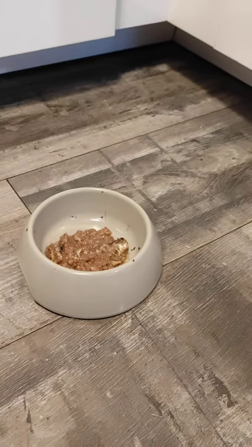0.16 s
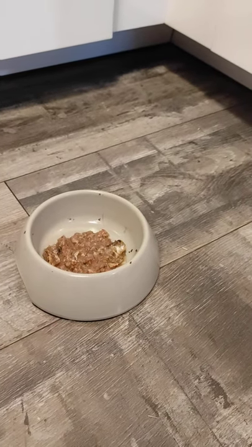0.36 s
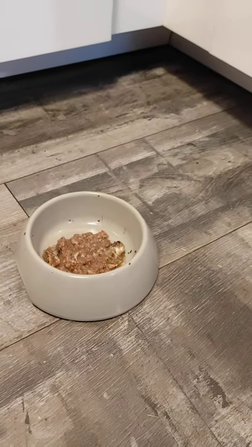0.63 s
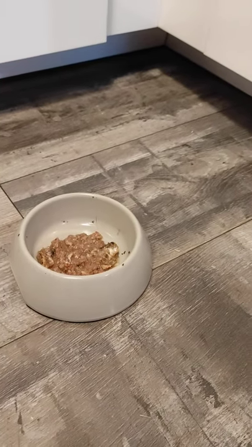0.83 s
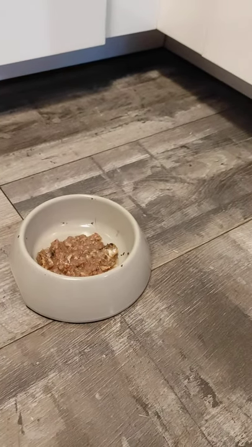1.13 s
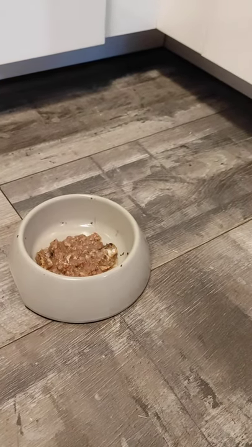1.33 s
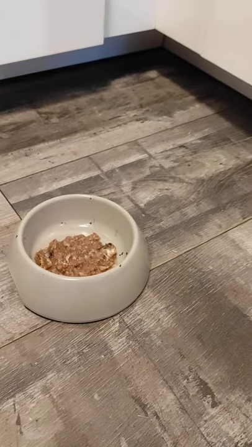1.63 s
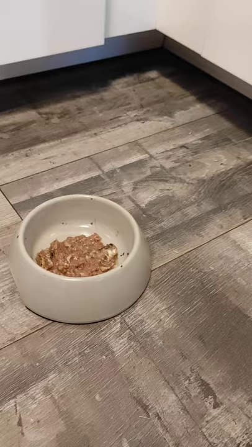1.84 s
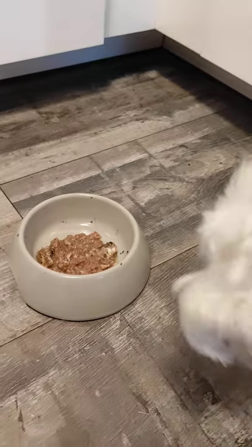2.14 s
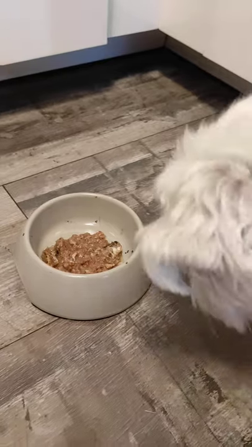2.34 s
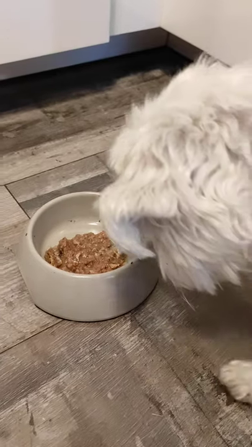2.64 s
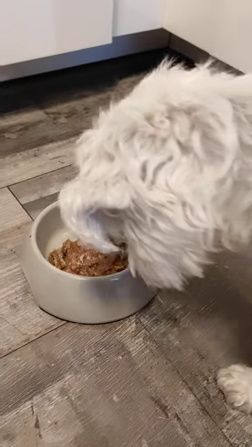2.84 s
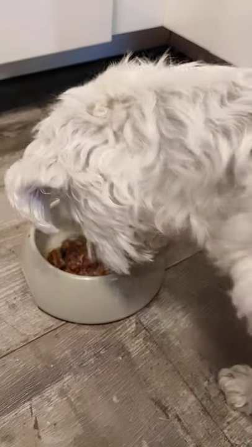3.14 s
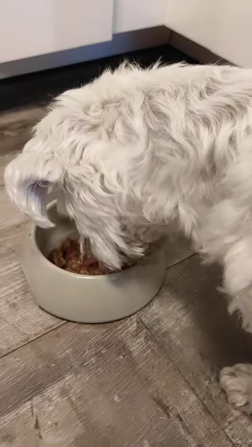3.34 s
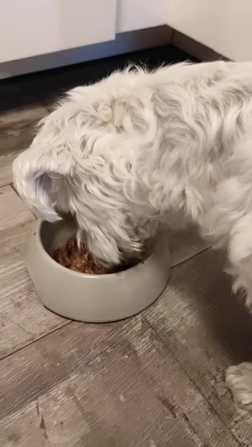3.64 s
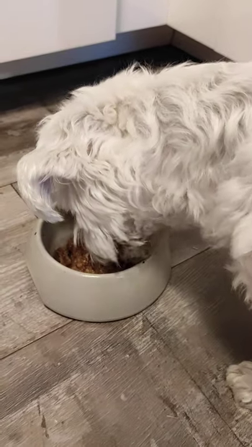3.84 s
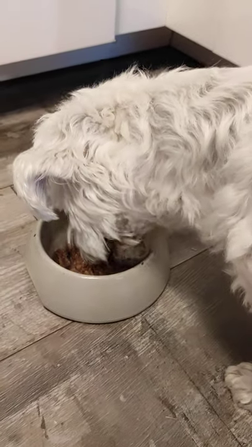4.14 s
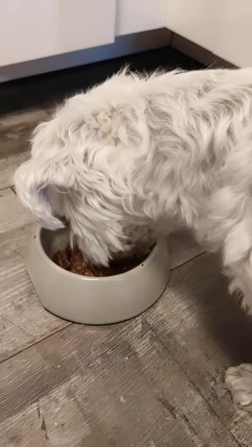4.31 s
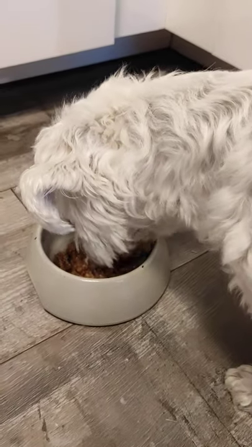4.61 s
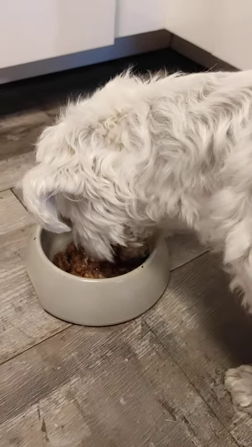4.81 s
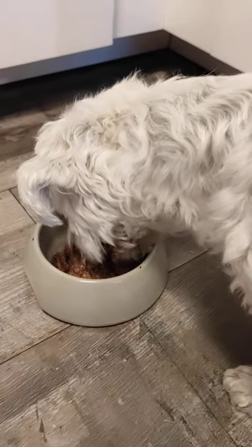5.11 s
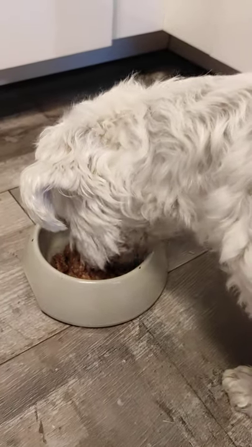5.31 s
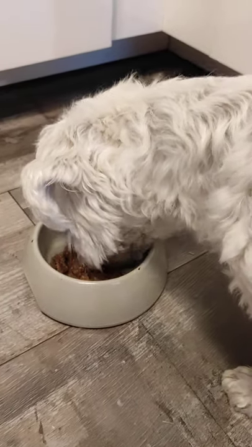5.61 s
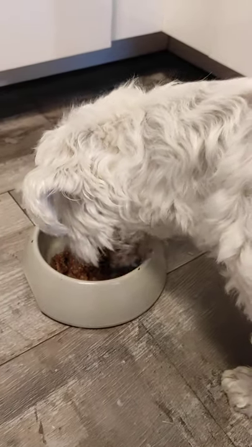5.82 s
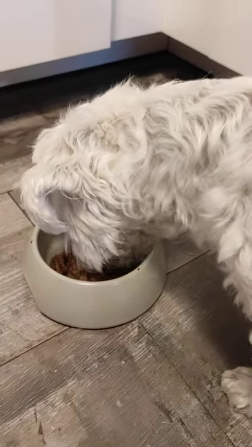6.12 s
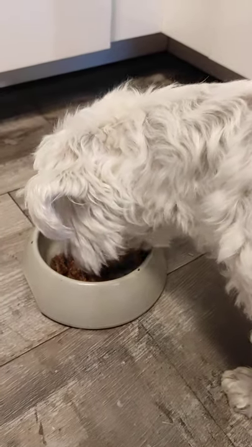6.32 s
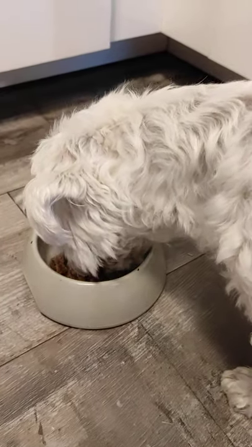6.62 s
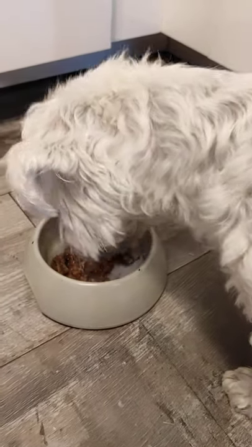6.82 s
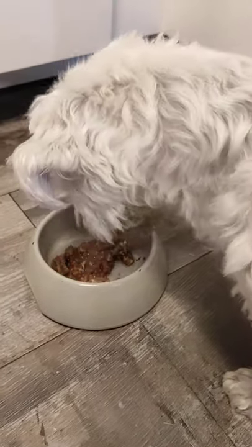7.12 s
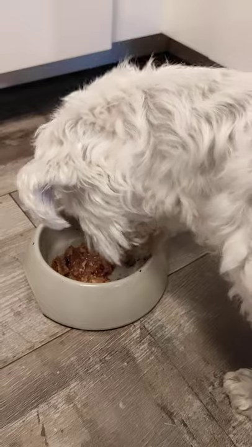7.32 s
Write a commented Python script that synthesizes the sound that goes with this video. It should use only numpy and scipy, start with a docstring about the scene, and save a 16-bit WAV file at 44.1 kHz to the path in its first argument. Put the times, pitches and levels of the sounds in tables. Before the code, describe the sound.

Dog claws tick and skid across a hard kitchen floor, then close wet smacking, licking and little pops as it eats over a low appliance hum.

```python
"""A small dog trots over a laminate kitchen floor to its bowl and eats wet food, heard close.
Claws tick and skid: short noise bursts and swells in three bands, with claw and floor resonances.
Wet smacks, licks and pops: bursts of tiny rings, wet crackle and rising damped tones.
The bowl bumps the floor as four decaying modes; a noise tail per band gives the hard kitchen.
Behind lie coloured noise and two steady tones of an appliance; left and right differ in treble."""
import sys
import numpy as np
from scipy import signal
from scipy.fft import rfft, irfft, next_fast_len
from scipy.io import wavfile
from scipy.ndimage import uniform_filter1d

SR = 44100
rng = np.random.default_rng(int(sys.argv[2]) if len(sys.argv) > 2 else 0)


def unload_wav(signal):
    """Save mono or channel-first audio to the path in sys.argv[1] as 16-bit WAV at rate SR, clipped to [-1, 1]."""
    wavfile.write(
        sys.argv[1],
        SR,
        np.round(np.clip(np.atleast_2d(signal).T, -1, 1) * 32767).astype(np.int16),
    )


N = 328986
SIZE = next_fast_len(N + 2048)
FREQ = np.maximum(np.arange(SIZE // 2 + 1) * SR / SIZE, 1)
SIDES = np.array([[.5], [-.5]])  # times a left-minus-right dB
LEFT_LATE_CLAWS, LEFT_LATE_EATING = -8, 10  # samples; negative: the left side hears first


# claws landing: start_s, treble_db, middle_re_treble_db, body_re_treble_db, claw_hz, floorboard_hz
CLAW_TICKS = [(0.0375, -41, -6, -17, 5200, 2420), (0.04, -31, -7, -24, 5660, 2420),
              (0.0514, -36.5, -3.5, -22, 4360, 1500), (0.3381, -27.5, -11, -24, 5900, 2440),
              (0.3765, -32, -5.5, -13.5, 5000, 1530), (0.5113, -44, -4, -10, 5270, 1810),
              (0.5227, -31.5, -12, -14, 5670, 1750), (0.578, -39, -6, -16, 5500, 1800),
              (0.607, -34, -2.5, -18, 5530, 2440), (0.728, -54, 3, -14, 4410, 1560),
              (0.8107, -25.5, -5, -10.5, 5370, 1520), (0.8428, -19.5, -8.5, -21.5, 5100, 1000),
              (0.9982, -30, -8.5, -14.5, 5860, 2520), (1.079, -43, -5, -9.5, 5590, 1190),
              (1.243, -47.5, -20, -7, 5710, 1220), (1.262, -53.5, 1.5, -5, 5400, 1350),
              (1.3657, -35, -11.5, -9.5, 5370, 2330), (1.466, -48.5, -0.5, -12, 5780, 1240),
              (1.531, -41, -5.5, -9, 4900, 1200), (1.687, -42, -3.5, -8, 5100, 920),
              (1.8437, -33.5, -6.5, -17, 5740, 910), (1.9941, -44, -3, -7, 4030, 1290),
              (2.015, -43, -5, -9, 4720, 1290), (2.047, -33.5, -9, -9.5, 4040, 2500),
              (2.0507, -26.5, -13.5, -16, 4150, 1240), (2.1587, -36, -12.5, -17.5, 4400, 824),
              (2.217, -42, -10, -9, 4550, 1050), (2.236, -45, -1.5, -1.5, 4030, 1060),
              (2.638, -30, -13.5, -21.5, 3570, 730), (2.8618, -27, -12, -14, 5000, 1010),
              (2.658, -46, -12, -19, 5000, 900), (2.901, -39.5, -5, -12, 5230, 1180),
              (3.192, -32, -8.5, -19, 4640, 1110), (3.1967, -44, -6, -4, 4640, 1120),
              (3.2102, -27.5, -8.5, -14, 4600, 780), (3.568, -58, -8, -3, 5040, 2340),
              (3.623, -50, -20, -24, 6000, 900), (3.63, -44.5, -9.5, -17, 5500, 883),
              (3.7599, -25, -12, -19.5, 4160, 910), (3.931, -40.5, -11.5, -2, 2800, 2320),
              (3.936, -57.5, -7.5, 9, 2710, 1290)]
CLAW_RATTLE_MS, CLAW_RISE_MS, CLAW_SHARPNESS = 5.78, 0.41, 1.2


def claws():
    """Hard claws hit the board in a short rattle; claw and floorboard ring broadly."""
    rows = []
    for row in CLAW_TICKS:
        pan_db, room_db = place(row[0])
        rows.append((*row, pan_db, CLAW_RATTLE_MS, room_db))
    return ticks(rows, grit(2.1, 0.15), CLAW_RISE_MS, CLAW_SHARPNESS, toes=True)


# claws dragging: peak_s, rise_s, fall_s, treble_db, middle_re_treble_db, body_re_treble_db
CLAW_SKIDS = [(0.015, 0.065, 0.058, -45, -3.5, -6), (0.043, 0.0098, 0.011, -35.5, 0.5, -14),
              (0.102, 0.0092, 0.04, -48, 3, 2), (0.198, 0.064, 0.06, -41, -2.5, -5),
              (0.339, 0.0095, 0.023, -34, -6, -4), (0.512, 0.015, 0.023, -45.5, -11, -3),
              (0.533, 0.036, 0.069, -32, -0.5, -9), (0.575, 0.023, 0.038, -46.5, -1.5, -1),
              (0.607, 0.03, 0.015, -39, 0.5, 1), (0.734, 0.021, 0.016, -51.5, 5, 0),
              (0.861, 0.019, 0.042, -35.5, -7, -1), (1.158, 0.013, 0.015, -38.5, -11, -11),
              (1.179, 0.024, 0.028, -36.5, 0.5, -7), (1.368, 0.0085, 0.005, -47, 13.5, -8),
              (1.869, 0.018, 0.013, -43.5, 3, 0.5), (2.085, .02, 0.047, -42.5, -3.5, -8),
              (2.225, 0.06, 0.016, -47, 3.5, -5), (2.382, 0.007, 0.016, -41.5, -3, -9),
              (2.393, 0.016, 0.022, -29, -7, -8), (2.44, 0.027, 0.025, -47, -4, -4),
              (2.515, 0.016, 0.052, -54.5, 1, 8.5), (2.615, 0.05, 0.018, -52, 2.5, 3),
              (2.636, .004, .012, -64, -3, -4), (3.05, 0.044, 0.043, -44.5, -3, -4.5),
              (3.564, 0.05, 0.035, -57.5, -3, -9), (3.778, 0.016, 0.0092, -52, -7, 12),
              (3.95, 0.017, 0.063, -60.5, -2.5, 7)]
STUTTER_DB, STUTTER_PER_S, DRAG_HZ, DRAG_SHARPNESS = 2, 200, 5200, 0.81


def skids():
    """The dragged claw sticks and slips: grit with stuttering level and a broad middle-band ring."""
    grains_mix = undb(-1.5) * grains(3500, 2.6, sharp=6.1, late=LEFT_LATE_CLAWS)
    scrape = crumble(grit(3.5, 0.035) + grains_mix)
    stutter = undb(STUTTER_DB * walk(STUTTER_PER_S, count=N))
    swells = drags([(*row, place(row[0])[0]) for row in CLAW_SKIDS])
    out = scrape * stutter * swells
    out[1] = 1.05 * signal.lfilter(*signal.iirpeak(DRAG_HZ, DRAG_SHARPNESS, SR), out[1])
    return out


# dog walking in from the right: time_s, left_minus_right_db, room_share_db
WALK_IN = [(0, -2.5, -2.5), (0.8, -1, -9), (1.3, 1, -2), (2.0, 3, -10.5), (3.2, 3.5, -9.5),
           (3.8, 5.5, -9.5)]


def place(s):
    """Where the walking dog is heard at a time: pan dB and room share dB."""
    at_s, pan_db, room_db = np.transpose(WALK_IN)
    return np.interp(s, at_s, pan_db), np.interp(s, at_s, room_db)


# short wet smacks, and near the end a harder rattling tick, perhaps a claw:
# start_s, treble_db, middle_re_treble_db, body_re_treble_db, middle_ring_hz
CLEAR_SMACKS = [(3.581, -48.5, 3, -3, 3280), (3.589, -49, 0, 6, 3560), (4.0836, -56, 4, -13, 6200),
                (4.1647, -51, -7, -1, 2500), (4.2846, -54.5, 2.5, 12, 6270), (4.339, -58, 4, -5, 3900),
                (4.4263, -44.5, 1, -19, 7000), (4.5272, -49.5, -22, -8, 2590), (4.566, -51, -18, -7, 2800),
                (4.5956, -51, 0.5, -1, 5300), (4.609, -49, -9, -2, 3980), (4.7403, -52.5, -2, -9, 3110),
                (4.862, -55, -18, 11, 2960), (4.9046, -40, -15, -13, 4870), (4.944, -47.5, -3, -3, 6300),
                (4.9739, -39.5, -13, -11, 4570), (5.0656, -48.5, -17, -10, 2730),
                (5.1334, -46, -2.5, 5.5, 4900), (5.187, -52, -14, 8, 2720), (5.2022, -51, -12, -7, 3700),
                (5.246, -46, -21, -2, 5600), (5.2695, -50, -16, -6, 2710), (5.3755, -50.5, -5, -11, 5270),
                (5.3941, -60, -15, -11, 5330), (5.4143, -47, -7, -11, 3570), (5.477, -40.5, -2.5, -8, 4600),
                (5.511, -47.5, -14, -2, 6500), (5.5418, -46, -26, 3.5, 3000), (5.5676, -38, -13, -7, 6760),
                (5.744, -53.5, 5.5, -9, 3260), (5.8163, -48.5, -4, -10, 5300), (5.85, -49, -22, -2, 5320),
                (5.866, -46, -22, -20, 6500), (5.878, -31.5, -9.5, -15, 3580),
                (5.9165, -40.5, -17, -18, 6200), (5.982, -44.5, 0, -9, 7000), (6.003, -50, -5, 4, 4970),
                (6.0155, -44.5, -14, -0.5, 2510), (6.1542, -41.5, -16, -30, 3530),
                (6.2387, -47, 2, -1, 5200), (6.284, -49, -19, -17, 5220), (6.309, -56, -15, -6, 6000),
                (6.339, -54, -15, -8, 6000), (6.3521, -46.5, -19, 5, 2550), (6.5011, -50.5, -14, -10, 2640),
                (6.5265, -53.5, 4, -18, 5800), (6.6256, -41.5, -18, -8, 2560), (6.641, -47, -17, -9, 4500),
                (6.6555, -50, -6, -4, 3800), (6.673, -35.5, -31, -17, 4160),
                (6.6805, -34.5, -30, -10.5, 2570), (6.7126, -36.5, -14, -19, 6740),
                (6.8406, -47, -6.5, 6, 4480), (6.958, -56, -22, -12, 3730), (7.0409, -45, -36, -17, 3980),
                (7.079, -47, -14, -20, 2890), (7.1762, -39, -4, -14, 5060), (7.1812, -39, -4, -19, 4360)]
# faint smacks: from_s, to_s, lowest_treble_db, middle_re_treble_db, body_re_treble_db
FAINT_SMACK_RANGE = (5.5, 7.3, -57.5, -4, -12)
SMACK_RISE_MS, SMACK_SHARPNESS, LOWEST_BODY_HZ = 3.36, 7, 1100
FAINTEST_RATTLE_MS, RATTLE_MS_PER_DB = 2.39, 0.11  # louder smacks rattle longer
SMACK_ROOM_DB, SMACK_PAN_DB, SMACK_PAN_SPREAD_DB = -10.5, -1.5, 1


def smacks():
    """Bursts of tiny rings with scattered middle and body colours; 16 faint ones at random."""
    from_s, to_s, faint_db, middle_db, body_db = FAINT_SMACK_RANGE
    faint = [(from_s + when * (to_s - from_s), faint_db + 6 * size, middle_db, body_db, 2500 * 2.6 ** pitch)
             for when, size, pitch in rng.random((16, 3))]
    rows = []
    for row in CLEAR_SMACKS + faint:
        body_hz = LOWEST_BODY_HZ * 2 ** rng.random()
        pan_db = SMACK_PAN_DB + SMACK_PAN_SPREAD_DB * rng.standard_normal()
        rattle_ms = FAINTEST_RATTLE_MS + RATTLE_MS_PER_DB * (row[1] - faint_db)
        rows.append((*row, body_hz, pan_db, rattle_ms, SMACK_ROOM_DB))
    return ticks(rows, grains(12000, 1.8, sharp=3.1), SMACK_RISE_MS, SMACK_SHARPNESS)


# tongue dragging through the mush: peak_s, length_s, treble_db
TONGUE_LICKS = [(3.987, 0.073, -65), (4.105, 0.094, -57), (4.233, .04, -62), (4.295, 0.13, -63),
                (4.45, 0.2, -64), (4.597, 0.074, -52), (4.745, 0.052, -56.5), (4.88, 0.18, -55.5),
                (4.957, 0.031, -54), (5.08, .12, -61), (5.195, 0.14, -56.5), (5.272, 0.039, -55),
                (5.406, 0.073, -55), (5.496, 0.15, -59), (5.567, 0.021, -46), (5.618, 0.084, -71),
                (5.746, 0.18, -62), (5.905, 0.063, -53), (5.99, 0.11, -64), (6.16, 0.088, -55),
                (6.29, 0.11, -66), (6.35, .06, -61), (6.508, 0.1, -59), (6.635, 0.039, -56),
                (6.7, 0.037, -62), (6.715, .12, -69), (6.958, 0.03, -54), (7.065, 0.063, -57),
                (7.208, 0.12, -64), (7.271, 0.025, -57)]
LICK_RISE_SHARE, LICK_MIDDLE_DB, LICK_BODY_DB, LICK_PAN_DB = 0.24, -6.5, 1, -2  # bands re treble


def licks():
    """The tongue drags through mush: wet crackle of tiny rings swells and fades."""
    rows = [(peak_s, LICK_RISE_SHARE * length_s, (1 - LICK_RISE_SHARE) * length_s, level_db,
             LICK_MIDDLE_DB, LICK_BODY_DB, LICK_PAN_DB) for peak_s, length_s, level_db in TONGUE_LICKS]
    return crumble(grains(2500, 1.9, sharp=3.2)) * drags(rows)


# air pockets popping in mouth and bowl; some (as near 4.0 s and 4.93 s) are followed about 10 ms later by a
# fainter echo at the same pitch: start_s, level_db, pitch_hz
AIR_POPS = [(2.372, -45, 910), (3.919, -54, 2980), (3.937, -46, 546), (3.951, -60, 633),
            (4.0005, -52, 3700), (4.002, -52, 1950), (4.0095, -63, 3700), (4.01, -55, 1950),
            (4.114, -61, 1770), (4.128, -63, 3900), (4.165, -56, 1030), (4.18, -53, 1160),
            (4.239, -54, 696), (4.288, -50, 1980), (4.338, -59, 3900), (4.34, -49, 1910),
            (4.4169, -56, 2010), (4.521, -46.5, 1070), (4.596, -52, 520), (4.609, -53, 1610),
            (4.642, -63, 4170), (4.714, -59, 1730), (4.77, -58, 1700), (4.843, -49, 1040),
            (4.88, -58, 1080), (4.908, -59, 1050), (4.934, -40.5, 507), (4.946, -50, 510),
            (4.944, -49, 1820), (5.103, -61, 1610), (5.134, -43.5, 1114), (5.1347, -51, 1700),
            (5.136, -46, 540), (5.152, -58, 1800), (5.188, -53, 1050), (5.222, -50, 1820),
            (5.223, -52, 2470), (5.279, -53, 2230), (5.413, -56, 2200), (5.481, -52, 476),
            (5.484, -51, 1050), (5.502, -52, 1180), (5.556, -52, 1130), (5.571, -55, 2260),
            (5.813, -57, 1250), (5.898, -47, 520), (5.936, -49, 540), (5.961, -46, 507), (5.983, -52, 1650),
            (6.026, -55, 1140), (6.179, -52.5, 855), (6.352, -47, 2260), (6.353, -56, 1150),
            (6.369, -54, 1120), (6.37, -57, 2000), (6.413, -46, 455), (6.626, -64, 1080),
            (6.657, -63, 1050), (6.677, -48, 2280), (6.684, -50, 2010), (6.699, -57, 2350),
            (6.711, -57, 1200), (6.812, -55, 1030), (6.842, -58, 1110), (7.029, -56, 1085),
            (7.125, -59, 1460), (7.186, -54, 1030)]
POP_T60_S, POP_T60_SLOPE = 0.033, -0.44  # at 1 kHz; higher pops die sooner
POP_ROOM_DB, POP_ROOM_T60_S = -3.5, 0.16


def pops():
    """Air pockets ring a few cycles, rising as they open, in uneven threes; a short tail follows."""
    out = squelch()
    for (start_s, level_db, hz), chance in zip(AIR_POPS, rng.random((len(AIR_POPS), 2, 2))):
        t60_s = POP_T60_S * (hz / 1000) ** POP_T60_SLOPE
        add(out, start_s, undb(level_db + 5 * SIDES) * ring(hz, t60_s, glide=.12))
        for late, off in chance:
            gain = undb(level_db - 1.0 + 15 * (off - late) * SIDES)
            after = ring(hz * (0.815 + 0.39 * off), 0.3 * t60_s, glide=0.29)
            add(out, start_s + 0.00156 + .011 * late, gain * after)
    t = np.arange(SR // 4) / SR
    tail = rng.standard_normal((2, len(t))) * 1000. ** (-t / POP_ROOM_T60_S) / 20
    return out + undb(POP_ROOM_DB) * signal.fftconvolve(out, tail, axes=1)[:, :N]


# small bursting pockets: from_s, to_s, low_hz, high_hz, smallest_db
SMALL_POCKETS = (4, 7, 697, 3700, -69)


def squelch():
    """260 small pockets burst at random through the meal, each a short rising ring."""
    out = np.zeros((2, N))
    from_s, to_s, low_hz, high_hz, smallest_db = SMALL_POCKETS
    for when, pitch, size, side in rng.random((260, 4)):
        hz = low_hz * (high_hz / low_hz) ** pitch
        gain = undb(smallest_db + 10.0 * size + 7.4 * (side - 0.5) * SIDES)
        add(out, from_s + when * (to_s - from_s), gain * ring(hz, 16 / hz, glide=0.34))
    return out


# muzzle bumping the bowl against the floor: start_s, level_db
BOWL_BUMPS = [(5.123, -45), (6.993, -30.5), (7.008, -33)]
# modes of a bump: pitch_hz, level_re_bump_db, t60_s
BOWL_MODES = [(183, -3, 0.1), (249, -5, 0.06), (540, -6, 0.026), (700, -25, 0.012)]


def bumps():
    """The bowl thuds on the floor: decaying modes."""
    out = np.zeros((2, N))
    for start_s, level_db in BOWL_BUMPS:
        for hz, mode_db, t60_s in BOWL_MODES:
            add(out, start_s, undb(level_db + mode_db + 2.9 * SIDES) * ring(hz, t60_s))
    return out


RATTLE_ROUNDNESS = 1.59  # 1 = lingering rattle, 2 = abrupt end
TOE_GAP_MS, TOE_RING_MS, TOE_BLUR = 1.5, 0.18, 0.3  # mean gap; toes land one after another
BODY_SHARPNESS = 2.3
RING_COUNT, RING_SHARPNESS, RING_DB = 4, 7.3, -8  # chance resonances, new on every tick


def ticks(rows, stuff, rise_ms, sharp, toes=False):
    """Tiny impacts over milliseconds, strongest early: direct sound and room feed, by band and side."""
    direct, room = np.zeros((2, 3, 2, N))
    bands = np.array([band(stuff, k) / band(stuff, k).std() for k in range(3)])
    chances = rng.random((len(rows), 6 + RING_COUNT))
    for row, chance in zip(rows, chances):
        start_s, level_db, middle_db, body_db, middle_hz, body_hz, pan_db, rattle_ms, room_db = row
        t_ms = np.arange(int(0.0051 * rattle_ms * SR)) / SR * 1000
        shape = np.minimum(t_ms / rise_ms, 1) * np.exp(-(t_ms / rattle_ms) ** RATTLE_ROUNDNESS)
        gate = 1
        if toes:
            landing_ms = TOE_GAP_MS * (np.cumsum(.5 + chance[:6]) - .5 - chance[0])
            since_ms = t_ms[:, None] - landing_ms
            gate = TOE_BLUR + np.sum((since_ms >= 0) * np.exp(-np.abs(since_ms) / TOE_RING_MS), axis=1)
        i = int(start_s * SR)
        piece = shape * gate * bands[..., i:i + len(t_ms)]
        # middle-band ring, then body-band ring
        piece[1] = signal.lfilter(*signal.iirpeak(middle_hz, sharp, SR), piece[1])
        piece[2] = signal.lfilter(*signal.iirpeak(body_hz, BODY_SHARPNESS, SR), piece[2])
        rings = sum(signal.lfilter(*signal.iirpeak(2500 * 3.54 ** up, RING_SHARPNESS, SR), piece[:2])
                    for up in chance[6:])
        piece[:2] = piece[:2] + undb(RING_DB) * rings
        # same energy in every band before its gain
        piece = piece * np.sqrt(np.sum(shape ** 2) / np.sum(piece ** 2, axis=2, keepdims=True))
        piece = undb(level_db + np.array([0, middle_db, body_db]))[:, None, None] * piece
        add(direct, start_s, undb(pan_db * SIDES) * piece)
        add(room, start_s, undb(room_db + 0.19 * pan_db * SIDES) * piece)
    return np.array([direct, room])


SWELL_ROUNDNESS = 1.26  # 1 = pointed peak, 2 = round top


def drags(rows):
    """Band envelopes of rubbing: 20 dB of swell and fade within the rise and fall times."""
    out, t = np.zeros((3, 2, N)), np.arange(N) / SR
    for peak_s, rise_s, fall_s, level_db, middle_db, body_db, pan_db in rows:
        a, b = max(int((peak_s - 2 * rise_s) * SR), 0), int((peak_s + 2 * fall_s) * SR)
        away = np.maximum((peak_s - t[a:b]) / rise_s, (t[a:b] - peak_s) / fall_s)
        bands_db = level_db + np.array([0, middle_db, body_db])[:, None, None]
        out[..., a:b] += undb(bands_db + pan_db * SIDES - 20 * away ** SWELL_ROUNDNESS)
    return out


def grit(spread_db, dense):
    """Stereo noise of rms 1; a share of samples stands out as tiny clicks."""
    x = pair(LEFT_LATE_CLAWS) * np.where(rng.random(N) < dense, scatter(spread_db), 1)
    return x / x.std()


def grains(per_s, spread_db, sharp, count=16, late=LEFT_LATE_EATING):
    """Stereo grains of rms 1: tiny rings of scattered pitch and size, so the colour keeps changing."""
    out, pair_noise = 0, pair(late)
    for hz in np.geomspace(800, 15000, count):
        size = (rng.random(N) < per_s / count / SR) * scatter(spread_db)
        out = out + signal.lfilter(*signal.iirpeak(hz, sharp, SR), size * pair_noise)
    return out / out.std()


CRUMBLE_DB, CRUMBLE_PER_S = 2.5, 45


def crumble(x):
    """Narrow registers of a scrape swell and sink on their own; their mean-square gain stays 1."""
    gains = undb([CRUMBLE_DB * walk(CRUMBLE_PER_S, count=N) for _ in range(14)])
    gains = gains / np.sqrt(np.mean(gains ** 2, axis=0))
    out = sum(gain * signal.lfilter(*signal.iirpeak(hz, 5, SR), x)
              for gain, hz in zip(gains, np.geomspace(700, 14000, 14)))
    return out / out.std()


def scatter(spread_db):
    """Sizes of tiny clicks: mostly alike, a few larger, none huge."""
    return undb(spread_db * np.minimum(rng.exponential(size=N), 2.5))


SIDES_ALIKE = 0.28  # power share of a close sound common to both sides


def pair(late):
    """Left and right noise, partly alike, the common part later on one side."""
    common, *own = rng.standard_normal((3, N))
    shared = np.array([np.roll(common, late), common])
    return np.sqrt(SIDES_ALIKE) * shared + np.sqrt(1 - SIDES_ALIKE) * np.array(own)


def ring(hz, t60_s, glide=0.):
    """A damped tone with a soft start; its pitch may rise."""
    t = np.arange(int(1.5 * t60_s * SR)) / SR
    tone = np.sin(2 * np.pi * hz * t * (1 + glide * t / t60_s))
    return tone * 1000. ** (-t / t60_s) * np.minimum(t * hz, 1)


# treble, middle, body: low_hz, high_hz
BAND_EDGES = [(6270, 19000), (2200, 10340), (520, 3700)]


def band(x, k):
    """One of the three bands."""
    return signal.sosfilt(signal.butter(2, BAND_EDGES[k], "band", fs=SR, output="sos"), x)


# kitchen decay of treble, middle, body: t60_s
KITCHEN_T60_S = [0.25, 0.34, 0.33]
SKID_ROOM_DB, LICK_ROOM_DB = -10.5, -15


def dog_in_kitchen():
    """Walls and cupboard doors answer claws and eating in uneven clumps, differently on each side."""
    direct, room = claws() + smacks()
    skid, lick = skids(), licks()
    dry = direct + skid + lick
    feed = room + undb(SKID_ROOM_DB) * skid + undb(LICK_ROOM_DB) * lick
    t, out = np.arange(SR // 2) / SR, 0
    for k in range(3):
        clumps = undb(2.0 * np.array([walk(141, count=len(t)) for _ in SIDES]))
        decay = 1000. ** (-t / KITCHEN_T60_S[k]) * np.clip(t / 0.001, 0, 1) / 20
        tail = clumps * rng.standard_normal((2, len(t))) * decay
        out = out + band(dry[k] + signal.fftconvolve(feed[k], tail, axes=1)[:, :N], k)
    return out


# appliance noise spectrum: freq_hz, relative_db_per_hz
HUM_SPECTRUM = [(20, -3), (55, -16), (90, -10), (120, -11), (330, -3), (362, -6.5), (385, -11),
                (700, -16.5), (1100, -18), (1750, -18), (2500, -23), (3500, -31.5), (4500, -37),
                (5500, -40), (9000, -38), (16000, -22.5)]
# humps on the spectrum: centre_hz, width_hz, height_db
HUM_HUMPS = [(167, 31, 12.5), (203.6, 14, 7.5), (264.7, 11.8, 12), (308.5, 10, 4.5), (1094, 28, 9.5),
             (1688, 50, 6.5)]
# likeness of left and right: freq_hz, correlation
HUM_LIKENESS = [(30, -0.13), (60, 0.42), (130, 0.98), (290, 0.84), (640, 0.24), (1410, -0.096),
                (3100, -0.072), (6820, -0.21), (15000, 0.024)]
# balance: freq_hz, left_minus_right_db
HUM_BALANCE = [(40, 5), (110, 0), (170, 2.5), (270, 8.5), (400, 2.5), (700, 0.5), (1290, 2.5), (2380, -3)]
# level of the 140-230 Hz rumble: time_s, level_db
HUM_SWELL = [(0, -1.4), (0.8, -0.5), (1.4, -1.5), (3.3, -1), (3.9, 1.8), (5.5, 2), (6.4, 0.5), (7.45, 2.3)]
# registers: low_hz, high_hz, waver_db, changes_per_s
HUM_REGISTERS = [(0, 140, 1.5, 3), (140, 230, 1.0, 5), (230, 400, 0.8, 5), (400, 1400, 1.2, 9),
                 (1400, 23000, 1.0, 12)]
HUM_DB = -52.5  # rms of the mean of both sides


def hum():
    """Humped motor rumble under air hiss, as noise; each register wavers alone; alike mainly in the bass."""
    humps = sum(height_db / (1 + (2 * (FREQ - hz) / width_hz) ** 2) for hz, width_hz, height_db in HUM_HUMPS)
    spectrum_db = on_freq(HUM_SPECTRUM) + humps
    alike = on_freq(HUM_LIKENESS)
    mid, side = rfft(rng.standard_normal((2, SIZE)))
    mid, side = mid * np.sqrt(1 + alike), side * np.sqrt(1 - alike)
    both = np.array([mid + side, mid - side]) * undb(spectrum_db + on_freq(HUM_BALANCE) * SIDES)
    at_s, swell_db = np.transpose(HUM_SWELL)
    swell = undb(np.interp(np.arange(N) / SR, at_s, swell_db))
    out = 0
    for low_hz, high_hz, waver_db, per_s in HUM_REGISTERS:
        register = irfft(both * (FREQ >= low_hz) * (FREQ < high_hz), SIZE)[:, :N]
        level = undb(waver_db * walk(per_s, count=N))
        out = out + register * level * (swell if low_hz == 140 else 1)
    return out * undb(HUM_DB) / out.mean(axis=0).std()


# steady tones: pitch_hz, rms_db before wavering
MOTOR_TONES = [(118, -68), (236, -76.5)]


def motor():
    """The turning tone of the appliance and its octave, wavering in strength."""
    t, out = np.arange(N) / SR, 0
    for hz, level_db in MOTOR_TONES:
        level = undb(level_db + 2.0 * walk(6.6, count=N) + 2.0 * SIDES)
        out = out + np.sqrt(2) * level * np.sin(2 * np.pi * hz * t)
    return out


def walk(per_s, count):
    """Random levels held 1 / per_s seconds and slewed twice; spread 1."""
    k = int(SR / per_s)
    held = np.repeat(rng.standard_normal(count // k + 1), k)
    x = uniform_filter1d(uniform_filter1d(held, k), k)[:count]
    return x / x.std()


def undb(db):
    """Gain of a dB value."""
    return 10 ** (np.asarray(db, float) / 20)


def add(track, s, sound):
    """Mix a sound in at a time."""
    i = int(s * SR)
    track[..., i:i + sound.shape[-1]] += sound[..., :N - i]


def on_freq(table):
    """A (Hz, value) table read at every frequency, on a log axis."""
    hz, value = np.transpose(table)
    return np.interp(np.log(FREQ), np.log(hz), value)


def causal(x, db):
    """Minimum-phase colouring: the response starts with the hit."""
    c = irfft(db * np.log(10) / 20, SIZE)
    c[1:SIZE // 2] *= 2
    c[SIZE // 2 + 1:] = 0
    return irfft(rfft(x, SIZE) * np.exp(rfft(c)), SIZE)[:N]


def scene():
    """Dog, bowl and kitchen."""
    return dog_in_kitchen() + pops() + bumps() + hum() + motor()


# treble colour of left and right: freq_hz, gain_db
TREBLE_COLOURS = [
    [(3000, 0.5), (4200, 3), (6000, 1.5), (7300, 5), (8300, 11.5), (9000, 2.5), (9600, -3.5), (12000, -22),
     (16000, -27.5)],
    [(3000, -1), (4200, 3.5), (5500, 6), (6500, 4.5), (7300, 14.5), (8200, 7.5), (9200, -0.5),
     (9700, -22.5), (12000, -17.5), (16000, -38)],
]
TOP_HZ = 16400


def record(dry):
    """Each side has a treble peak, then a sharp drop to a dull top; a steep cut ends it."""
    coloured = np.array([causal(x, on_freq(colour)) for x, colour in zip(dry, TREBLE_COLOURS)])
    return signal.sosfilt(signal.ellip(10, .2, 80, TOP_HZ, fs=SR, output="sos"), coloured)


dry = scene()
out = record(dry)
unload_wav(out)
```